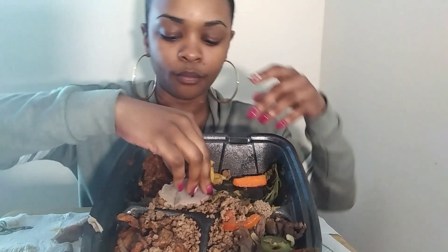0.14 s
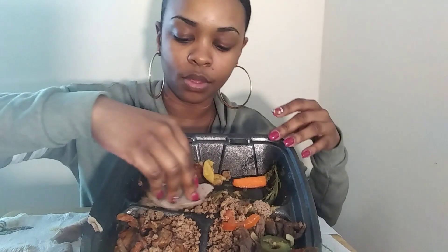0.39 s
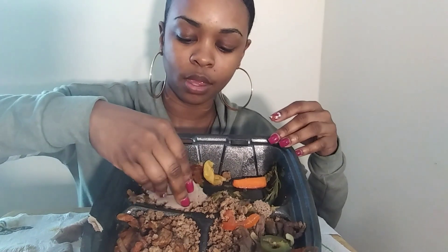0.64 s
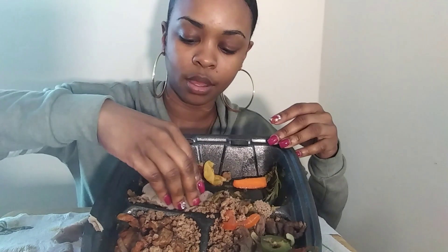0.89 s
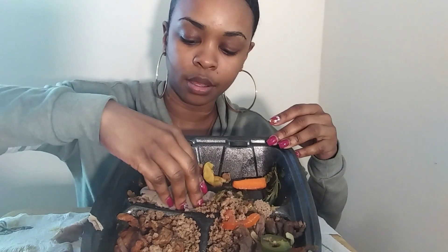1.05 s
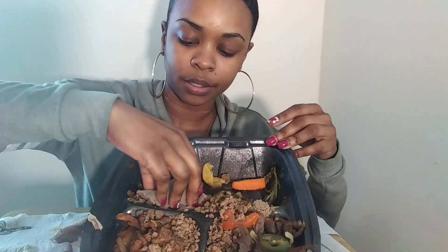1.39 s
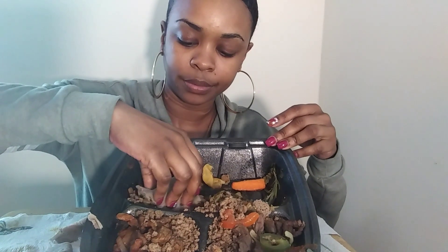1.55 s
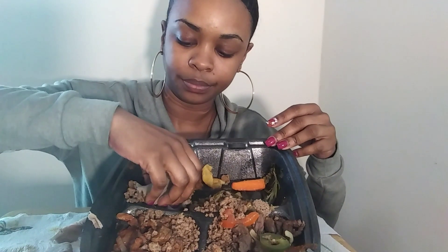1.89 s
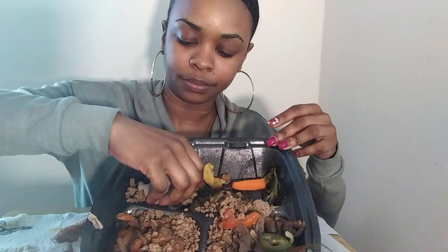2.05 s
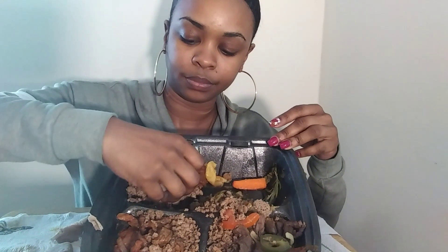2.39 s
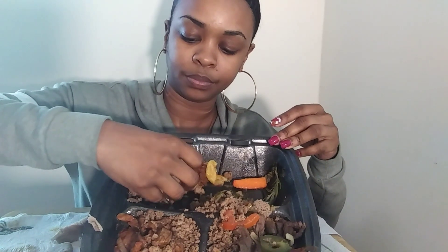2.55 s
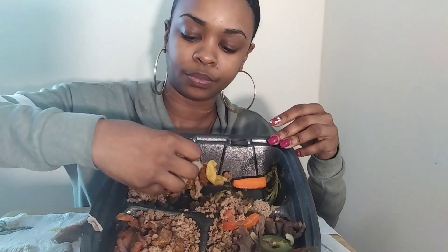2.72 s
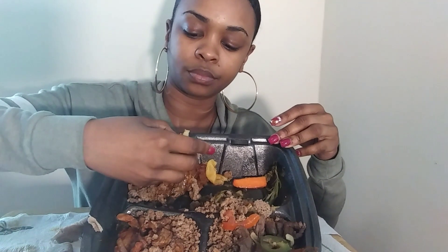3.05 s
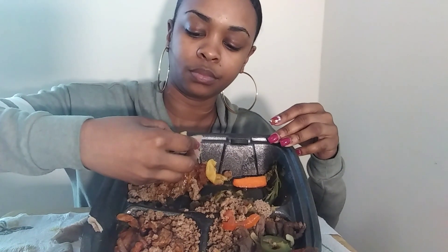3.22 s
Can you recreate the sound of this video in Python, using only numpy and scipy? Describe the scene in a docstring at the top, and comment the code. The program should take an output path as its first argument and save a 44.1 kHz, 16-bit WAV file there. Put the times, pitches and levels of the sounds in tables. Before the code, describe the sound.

A foam food container pops and creaks under a hand, close in a small room with faint wavering low hum and hiss. Soft bread pats and rustle at 0.3-0.65 s, a bright nail tick at 0.8, faint pats after 1. A rasping creak at 1.5, hollow judders 1.8-1.95, faint creaks 2.05-2.15, loudest sharp snaps 2.23-2.7. Quiet, then a soft pat with two tiny rising squeaks at 3.1 and a weak snap at 3.2.

```python
"""Tearing flatbread over a foam container

Fingers tear soft flatbread and gather food in a foam container, in a small room with a wavering hum.
Bread is filtered crumb ruptures: soft pats over a faint rustle. Foam is pulses and short dense rings,
grouped into snaps, judders and creaks. A fingernail ticks once as one bright pulse with its ring.
Short sine tones make a tiny high ping and, later, two rising squeaks of food being lifted.
Hum and hiss are sines and filtered noise."""
import sys
import numpy as np
from scipy import signal
from scipy.fft import rfft, irfft
from scipy.io import wavfile
from scipy.ndimage import uniform_filter1d

SR = 44100
rng = np.random.default_rng(int(sys.argv[2]) if len(sys.argv) > 2 else 0)


def store_wav(level_fs):
    """Save 16-bit WAV to argv[1]."""
    pcm = np.round(np.clip(np.atleast_2d(level_fs), -1, 1) * 32767)
    wavfile.write(sys.argv[1], SR, pcm.T.astype(np.int16))


N = 149940  # length [samples]
HZ = np.fft.rfftfreq(4096, 1 / SR)  # frequency grid of the tone filters


def amp(db):
    """Decibels to gain."""
    return 10 ** (np.asarray(db) / 20)


def unit(x):
    """Scales to an energy of one."""
    return x / np.sqrt(np.sum(x ** 2) + 1e-20)


def evened(x):
    """Scales to an rms of one."""
    return unit(x) * np.sqrt(len(x))


def add(mix, start_s, sound):
    """Mixes a sound in at a time, cutting what runs past the end."""
    part = mix[max(round(start_s * SR), 0):][:len(sound)]
    part += sound[:len(part)]


def colour(x, points, extra_db=0):
    """Minimum-phase filter of unit energy from (Hz, dB) points, with an optional change of tone."""
    point_hz, point_db = np.transpose(points)
    db = np.interp(np.log(HZ + 1), np.log(point_hz), point_db)
    log_gain = np.log(amp(db + extra_db) / np.sqrt(np.mean(amp(db) ** 2)))
    mirrored = np.r_[log_gain, log_gain[-2:0:-1]]
    # the Hilbert transform supplies the phase that makes the filter causal
    spectrum = np.exp(np.conj(signal.hilbert(mirrored))[:len(HZ)])
    return signal.fftconvolve(x, irfft(spectrum))


BASS_HZ, TREBLE_HZ = 980, 4460  # shelf corners


def tone(bass_db, treble_db):
    """Bass and treble shelves, in dB over frequency."""
    bass = bass_db / (1 + (HZ / BASS_HZ) ** 2)
    treble = treble_db * (1 - 1 / (1 + (HZ / TREBLE_HZ) ** 4))
    return bass + treble


def flat(x, size=90):
    """Evens out the spectrum of a short burst, so that it has no pitch of its own."""
    spectrum = rfft(x, 2 * len(HZ))
    smooth_power = abs(uniform_filter1d(abs(spectrum) ** 2, size))
    return unit(irfft(spectrum / np.sqrt(smooth_power + 1e-4))[:len(x)])


EDGES = np.geomspace(140, 18000, 13)  # band edges [Hz]
BANDS = [(lo, hi, signal.butter(2, [lo, hi], "band", fs=SR, output="sos"))
         for lo, hi in zip(EDGES, EDGES[1:])]


def ring(length, t60, damping, tilt_db=0):
    """Dense ringing: noise bands that die faster the higher they lie (t60 at 2 kHz, tilt per octave)."""
    t = np.arange(0, length, 1 / SR)
    out = 0
    for lo, hi, sos in BANDS:
        height = np.sqrt(lo * hi) / 2000
        decay = np.exp(-np.log(1000) * t / t60 * height ** damping)
        band = unit(signal.sosfilt(sos, rng.standard_normal(len(t)) * decay))
        out = out + band * np.sqrt(hi - lo) * amp(tilt_db * np.log2(height))
    return unit(out)


CRACK_DAMPING = .36  # how much faster the treble of a crack dies


def crack(pulses, t60, sharp):
    """A sudden broadband release: pulses hold the sharp share of the energy, a short dense ring the rest."""
    out = np.sqrt(1 - sharp) * ring(.06, t60, CRACK_DAMPING)
    add(out, 0, np.sqrt(sharp) * unit(pulses))
    return flat(out)


HUM_WAVER, HUM_WAVER_HZ = 0.21, 14  # rms waver (share of level, radians of phase) and its speed limit
AIR_DB = -62  # rms level of the hiss
# appliance hum partials: (frequency [Hz], rms level before waver [dB])
HUM_PARTIALS = [(236.9, -59), (360.7, -68.5)]
# tone of the room hiss: (frequency [Hz], relative gain [dB])
AIR_TONE = [(25, -20), (90, -17.5), (160, -7.5), (260, 4), (450, 1), (700, -5.5), (1400, -8), (3500, -16.5),
            (6500, -29), (10500, -23)]


def background():
    """An appliance hums on a few partials, wavering in level and phase, over the hiss of the room."""
    t = np.arange(N) / SR
    # extra noise lets the filter settle before the start
    hiss = colour(rng.standard_normal(N + len(HZ)), AIR_TONE)[len(HZ):][:N]
    out = amp(AIR_DB) * evened(hiss)
    smooth = 1 / (1 + (np.fft.rfftfreq(N, 1 / SR) / HUM_WAVER_HZ) ** 2)
    for hz, db in HUM_PARTIALS:
        noises = rng.standard_normal((2, N))
        swell, drift = (HUM_WAVER * evened(irfft(rfft(noise) * smooth, N)) for noise in noises)
        out += np.sqrt(2) * amp(db) * (1 + swell) * np.sin(2 * np.pi * hz * t + drift)
    return out


CRUMBS_PER_S, CRUMB_SPREAD_DB = 2500, 3.5  # mean rate, and how unevenly the ruptures are sized


def crumbs(count):
    """Many tiny ruptures: random pulses of uneven size."""
    size = amp(CRUMB_SPREAD_DB * np.minimum(rng.exponential(1, count), 4))
    breaks = rng.random(count) < CRUMBS_PER_S / SR
    return size * rng.standard_normal(count) * breaks


PAT_DB = -22.5  # shared level of the pats
# level of the tearing rustle: (time [s], level [dB])
TEAR_LEVEL = [(0, -73.5), (.28, -77.5), (.47, -63.5), (.54, -70.5), (.64, -70), (.76, -77.5), (1.3, -78),
              (1.7, -77), (2.85, -75.5), (3.3, -80)]
# tone of the rustle: (frequency [Hz], relative gain [dB])
RUSTLE_TONE = [(200, -9.5), (600, 10.5), (2000, -1.5), (4000, 1), (6000, -7.5), (10000, -4.5), (15500, -22)]
# fingertips pressing soft bread: (time [s], length [s], level relative to PAT_DB [dB])
PATS = [(0.316, 0.025, -3), (0.377, 0.023, -5), (0.558, 0.008, -5), (0.623, 0.02, 0.5),
        (1.067, 0.067, -6.5), (1.133, 0.014, -3.5), (1.457, 0.0054, -6.5), (1.529, 0.0047, 5.5),
        (3.081, 0.028, 4)]
# dull tone of the pats: (frequency [Hz], relative gain [dB])
BREAD_TONE = [(120, -13.5), (350, 6.5), (1000, 1), (2500, -8.5), (5500, -24.5), (10000, -24.5),
              (15500, -37)]


def bread():
    """Dull fingertip pats, swells of tiny filtered ruptures, over the faint rustle of tearing."""
    rustle = evened(colour(crumbs(N), RUSTLE_TONE)[:N])
    out = amp(np.interp(np.arange(N) / SR, *np.transpose(TEAR_LEVEL))) * rustle
    for start_s, length_s, db in PATS:
        count = int(length_s * SR)
        press = np.sin(np.pi * np.linspace(0, 1, count) ** 0.65)  # quick press, slower release
        pat = unit(colour(crumbs(count) * press, BREAD_TONE))
        add(out, start_s, amp(PAT_DB + db) * pat)
    return out


NAIL_S, NAIL_DB, NAIL_T60_S, NAIL_SHARP = .8215, -9, .004, .65  # time, energy level, decay, pulse share
# tone of the tick: (frequency [Hz], relative gain [dB])
NAIL_TONE = [(300, -12.5), (1300, -19), (2300, .5), (3200, -3), (4150, 3.5), (5400, -16), (7000, -9),
             (7800, -19), (10500, -6), (12500, -18), (15000, -32)]


def nail():
    """One hard, bright tick of a fingernail: a single pulse with a very short ring."""
    tick = crack(np.ones(1), NAIL_T60_S, NAIL_SHARP)
    return amp(NAIL_DB) * unit(colour(tick, NAIL_TONE))


LEAD_S = .0004  # the ring starts this long before the first jerk
CHATTER_S, CHATTER_FALL_DB = .0006, -2.5  # mean spacing, and change in level per jerk


def chatter(count=7):
    """Uneven jerks in quick succession: a small one, the main one, then ever weaker ones."""
    out = np.zeros(SR // 20)
    for k, (shift, way) in enumerate(rng.uniform(-1, 1, (count, 2))):
        jerk_s = LEAD_S + (k + .5 * shift * (k > 0)) * CHATTER_S
        jerk = np.sign(way) * amp(abs(k - 1) * CHATTER_FALL_DB)
        add(out, jerk_s, [jerk])
    return out


SLIP_T60_S, SLIP_SHARP = .012, .3  # ring decay at 2 kHz, and pulse share of the energy
# tone of the foam, shared by slips and judders: (frequency [Hz], relative gain [dB])
FOAM_TONE = [(120, -12), (250, -9), (450, 2), (900, -1.5), (1600, -1), (2600, 2), (3600, -1), (5300, -13.5),
             (7000, -13), (10000, -16), (15500, -29.5)]


def slip(db, bass_db, treble_db):
    """The foam lets go: chattering pulses over a short dense ring."""
    snap = crack(chatter(), SLIP_T60_S, SLIP_SHARP)
    return amp(db) * colour(snap, FOAM_TONE, tone(bass_db, treble_db))


CREAK_T60_S, CREAK_SHARP = 0.016, 0.15  # ring decay at 2 kHz, and pulse share of the energy
CREAK_CHANGE = 0.65  # share of each slip's energy that is new
CREAK_PUSH_DB = -2.5  # applied once mid-push and twice at the ends
# rasping tone of the creaks: (frequency [Hz], relative gain [dB])
RASP_TONE = [(150, -17), (450, 1.5), (1400, -4), (2550, 4), (3300, -1.5), (4000, -.5), (5500, -14),
             (6700, -9), (8000, -16), (9600, -13.5), (11500, -27), (15500, -33)]


def creak(length, slow, fast, db, bass_db, treble_db):
    """A rasping run of like slips whose rate and strength rise and fall with the push."""
    shared, *others = [crack(np.ones(1), CREAK_T60_S, CREAK_SHARP) for _ in range(13)]
    out, t = np.zeros(SR // 5), 0
    for other in others:
        if t < length:
            push = np.sin(np.pi * t / length)
            one_slip = unit(np.sqrt(1 - CREAK_CHANGE) * shared + np.sqrt(CREAK_CHANGE) * other)
            add(out, t, amp(CREAK_PUSH_DB * (2 - push)) * one_slip)
            t += 1 / (slow + (fast - slow) * push)
    return amp(db) * colour(out, RASP_TONE, tone(bass_db, treble_db))


JERK_S, JERK_JITTER = .0024, .2  # mean spacing, and its unevenness as a share
JERK_T60_S, JERK_SHARP = 0.0089, 0.51  # ring decay at 2 kHz, and pulse share of the energy
WALL_DB, WALL_DETUNE = -1.5, 0.0087  # relative level of the ringing wall, and largest random pitch share
# resonances of the tray wall: (frequency before detuning [Hz], relative level [dB], t60 [s])
WALL_MODES = [(1203, 1.5, .055), (1523, -1, .04), (1830, -1.5, .028), (2035, 4.5, .036), (2120, 4, .045)]


def judder(length, db, bass_db, treble_db):
    """A burst of equally strong jerks that keeps the tray wall's damped resonances ringing."""
    t, jerks = np.arange(SR // 10) / SR, np.zeros(SR // 10)
    for k in range(max(round(length / JERK_S), 1)):
        jerk_s = JERK_S * (k + JERK_JITTER * rng.uniform(-1, 1) * (k > 0))
        add(jerks, jerk_s, crack(np.ones(1), JERK_T60_S, JERK_SHARP))
    out = colour(flat(jerks), FOAM_TONE, tone(bass_db, treble_db))
    wall = 0
    for hz, level_db, t60 in WALL_MODES:
        mode_hz = hz * (1 + WALL_DETUNE * rng.uniform(-1, 1))
        mode = np.exp(-np.log(1000) * t / t60) * np.sin(2 * np.pi * mode_hz * t)
        wall = wall + amp(level_db) * unit(signal.fftconvolve(jerks, mode))
    add(out, 0, amp(WALL_DB) * unit(wall))
    return amp(db) * out


FOAM_DB = -8.3  # shared level; the levels in the three tables are relative to it
# single snaps: (time [s], level [dB], bass [dB], treble [dB])
SLIPS = [(1.4953, -17.5, 8, -2), (1.5213, -10, -8, 7.5), (2.1037, -21, 5, -9), (2.1203, -17.5, 5, -4),
         (2.2308, -6.5, 2, 4), (2.24, 2, -3.5, -27), (2.244, -5.5, 1, 6), (2.2645, 2.5, -1.5, 3),
         (2.3948, 1.5, -0.5, 1.5), (2.4271, 2.5, -5, -3.5), (2.4601, -0.5, -3.5, -0.5),
         (2.5123, -20, 10.5, 3), (2.574, -3, -4, -1), (2.6088, -5, 0.5, 0.5), (2.6437, -3, -2, 1),
         (2.707, -5.5, -2, -5), (3.19, -13.5, 6, 7)]
# quick runs of slips: (time [s], length [s], rate at the ends [slips/s], rate mid-push [slips/s],
# level [dB], bass [dB], treble [dB])
CREAKS = [(1.5404, .040, 183, 280, -3.5, -2.5, 0), (2.0465, 0.037, 97, 102, -15, 9.5, -7.5),
          (2.1272, 0.027, 200, 270, -19.5, 13, -13)]
# the tray wall judders under the hand: (time [s], length [s], level [dB], bass [dB], treble [dB])
JUDDERS = [(1.8087, .0052, -3, -7.5, -6), (1.8172, .0035, -5.5, -6, -7), (1.8382, .008, -0.5, -5, -4),
           (1.8689, .0105, .5, -3.5, -5), (1.9073, .0055, -3.5, -5, -2), (1.9235, .0155, -1, 2, -2)]


def container():
    """The foam sticks and slips under the hand in snaps, creaks and judders."""
    out = np.zeros(N)
    for table, sound in [(SLIPS, slip), (CREAKS, creak), (JUDDERS, judder)]:
        for start_s, *settings in table:
            add(out, start_s, sound(*settings))
    return amp(FOAM_DB) * out


TONE_RISE, OVERTONE_DB = 0.024, -26  # whole rise as a share of pitch, relative octave level


def short_tone(length, hz, db):
    """A brief, slightly rising sine with a faint octave, swelling and fading."""
    u = np.linspace(0, 1, int(length * SR))
    phase = 2 * np.pi * np.cumsum(hz * (1 + TONE_RISE * (u - .5))) / SR
    voice = np.sin(phase) + amp(OVERTONE_DB) * np.sin(2 * phase)
    return amp(db) * np.sin(np.pi * u) * voice


ROOM_DB, ROOM_T60_S, ROOM_GAP_S = -7.5, 0.21, .008  # tail level, decay at 2 kHz, delay
ROOM_DAMPING, ROOM_TILT_DB = 0.065, 0.5  # faster treble decay, and tilt per octave
ROOM_STEP_S = .06  # time step of the crossfade between the scattered room responses
# reflections from nearby surfaces: (delay [s], level [dB], scatter t60 [s])
ECHOES = [(.0026, -8, 0.017), (.009, -14, 0.0078)]


def room(x, count=5):
    """Scattered reflections and a short tail: random responses crossfaded in steady rotation."""
    out, place = np.zeros(N), np.arange(N) / SR / ROOM_STEP_S
    for k in range(count):
        response = np.zeros(SR // 2)
        for delay_s, db, t60 in ECHOES:
            add(response, delay_s, amp(db) * flat(ring(2 * t60, t60, 0)))
        tail = ring(.5, ROOM_T60_S, ROOM_DAMPING, ROOM_TILT_DB)
        add(response, ROOM_GAP_S, amp(ROOM_DB) * tail)
        share = np.sin(np.pi / 2 * np.minimum((place - k) % count, 2))
        out += signal.fftconvolve(x * share, response)[:N]
    return out


NEAR_ROOM_DB = -2  # sounds aimed at the microphone stir the room less
LOW_CUT_HZ = 227  # low cut on the hand sounds
# short tones, a tiny high ping, then two rising squeaks: (time [s], length [s], mid pitch [Hz], level [dB])
SHORT_TONES = [(2.172, .0035, 4550, -50.5), (3.0935, .012, 641, -35.5), (3.102, 0.013, 791, -38)]


def scene():
    """The hand at work in the container, with its lows cut, heard in the room over its background."""
    hand, near = bread() + container(), np.zeros(N)
    add(near, NAIL_S, nail())
    for start_s, *settings in SHORT_TONES:
        add(near, start_s, short_tone(*settings))
    heard = hand + near + room(hand + amp(NEAR_ROOM_DB) * near)
    low_cut = signal.butter(2, LOW_CUT_HZ, "high", fs=SR, output="sos")
    return (signal.sosfilt(low_cut, heard) + background())[None]


EDGE_HZ = 15600  # upper band limit


def record(dry):
    """Steep linear-phase low-pass that removes the top treble."""
    low_pass = signal.firwin(511, EDGE_HZ, window=("kaiser", 9), fs=SR)
    return signal.oaconvolve(dry, low_pass[None], "same")


dry = scene()
out = record(dry)
store_wav(out)
```